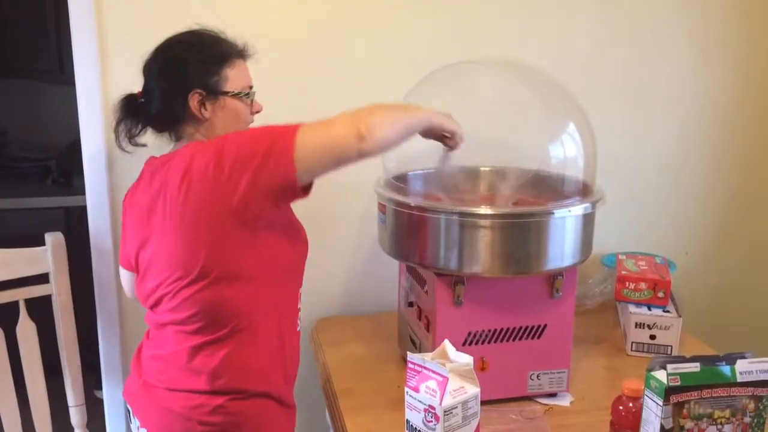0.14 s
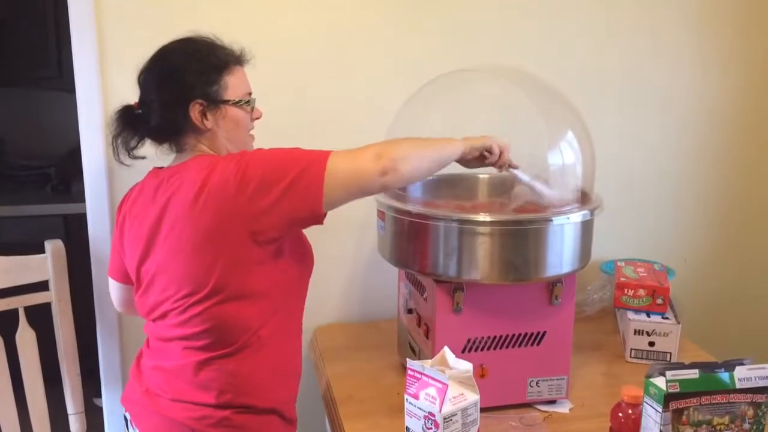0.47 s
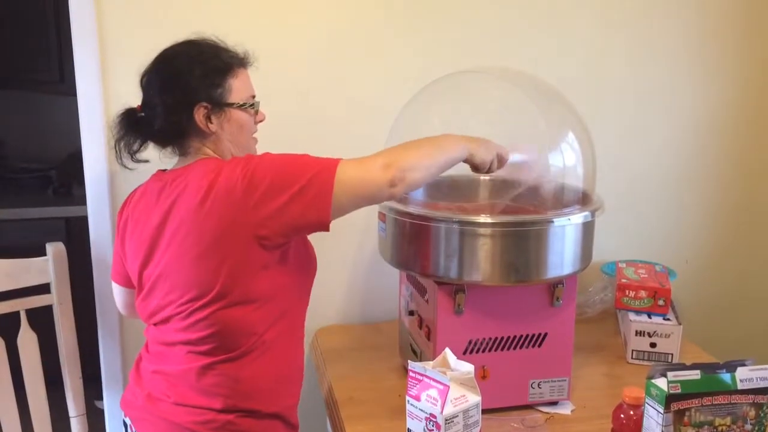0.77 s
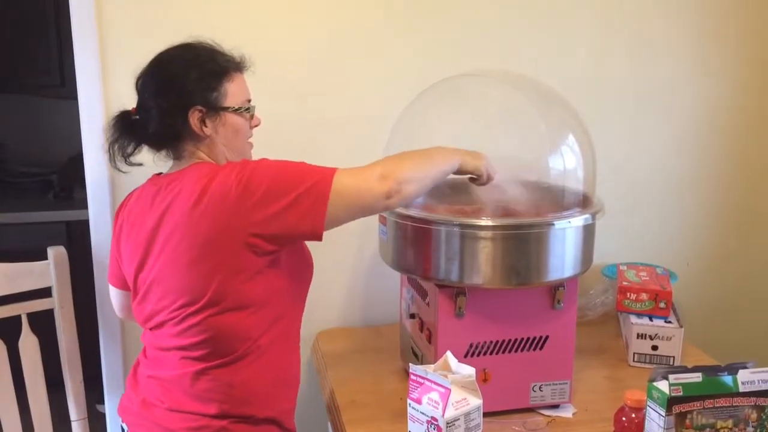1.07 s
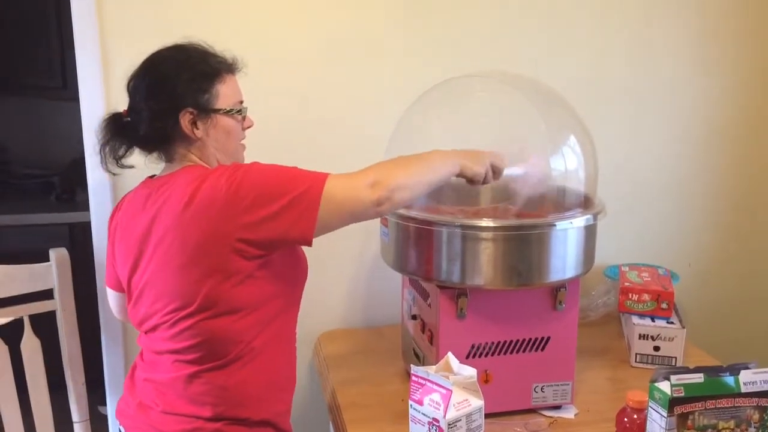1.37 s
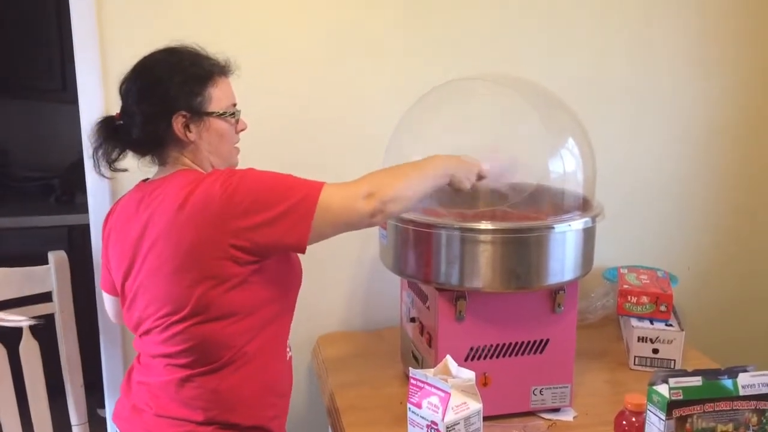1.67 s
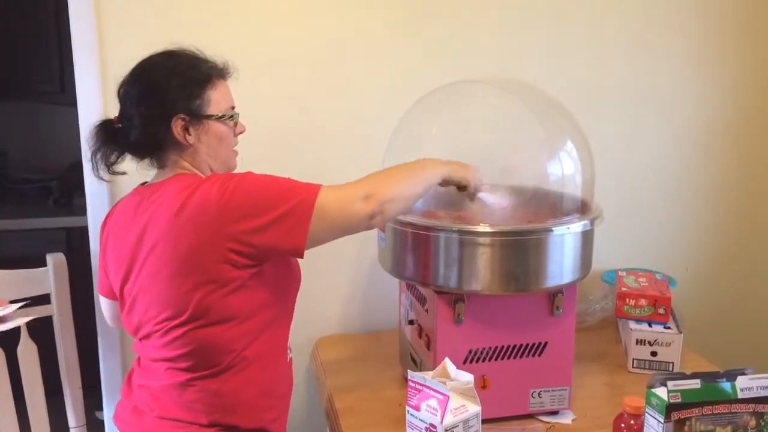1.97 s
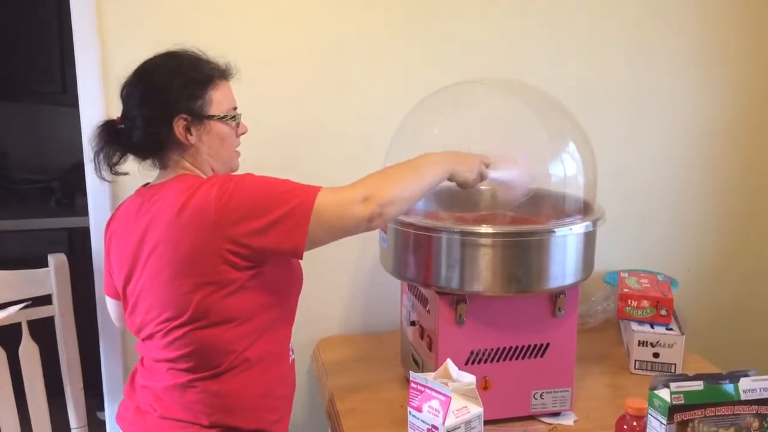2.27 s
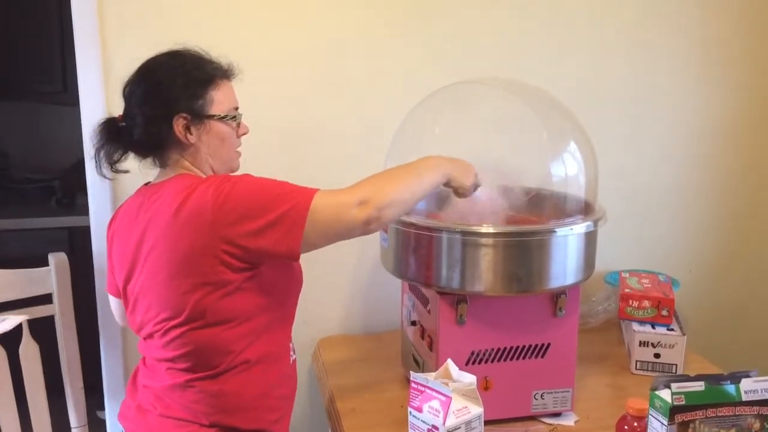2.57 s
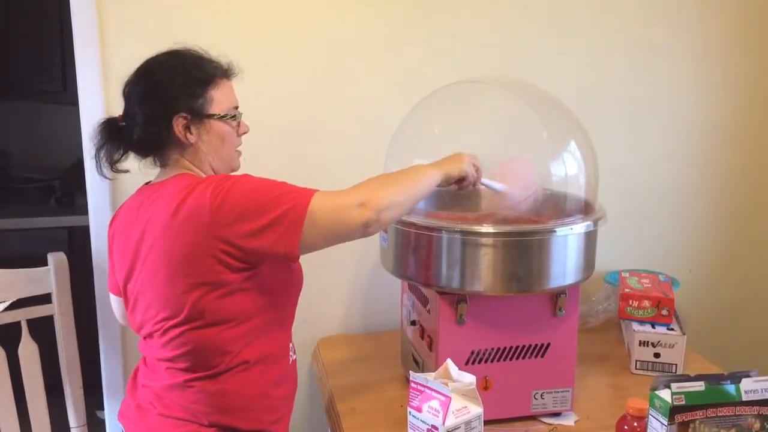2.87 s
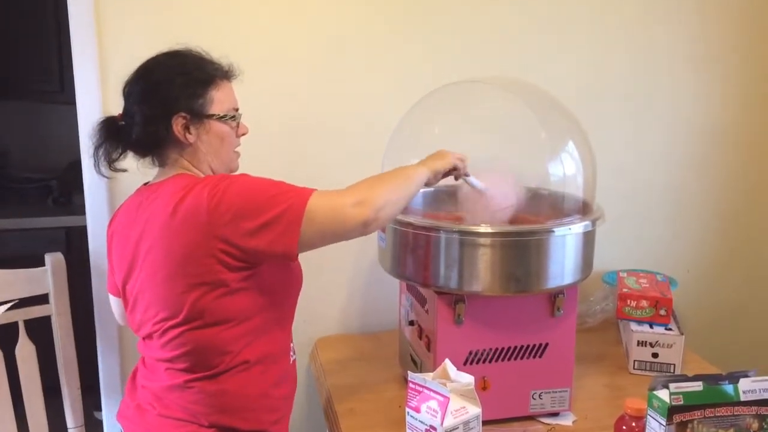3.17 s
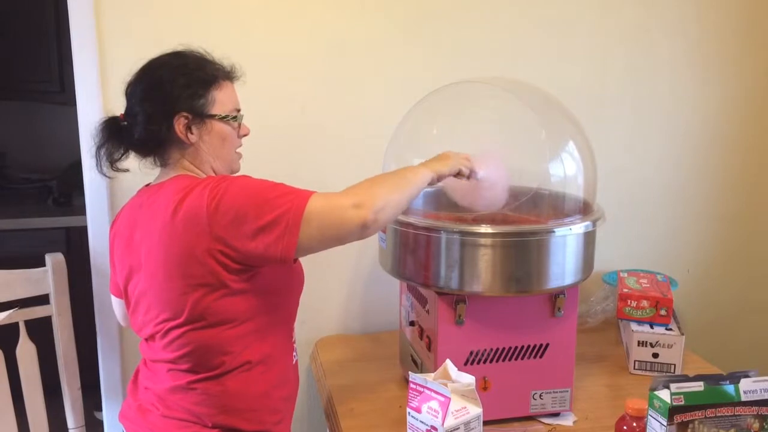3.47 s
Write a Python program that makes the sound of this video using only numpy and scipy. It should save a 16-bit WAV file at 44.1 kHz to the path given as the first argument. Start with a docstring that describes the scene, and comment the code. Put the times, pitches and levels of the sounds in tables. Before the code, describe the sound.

A cotton candy machine spins nearby indoors with a constant low hum, an airy whir and a thin metallic rattle. Soft low bumps come first, then scattered small knocks and two light taps, and another bump near the end.

```python
"""A cotton candy machine runs steadily on a wooden table in a small room. From the start, its
unbalanced spinning head makes the housing hum and buzz, a bearing sings and chatters once or twice
per turn, and the steel bowl rings as air whirs round it. Two soft, low bumps come right away, then
the bearing starts to knock now and then. Light taps sound in the room at about 1.1 and 2.2 seconds,
and one more bump comes just before the end."""
import sys
import numpy as np
from scipy import signal
from scipy.fft import rfft, irfft
from scipy.io import wavfile

SR = 44100
rng = np.random.default_rng(int(sys.argv[2]) if len(sys.argv) > 2 else 0)


def master_out(mix):
    """Clip the mix to full scale and print it as 16-bit PCM to the path in sys.argv[1]."""
    frames = np.transpose(np.atleast_2d(mix))
    ceiling = np.clip(frames, -1, 1)
    pcm = np.round(ceiling * 32767).astype(np.int16)
    wavfile.write(sys.argv[1], SR, pcm)


N = 160524

# tones of the housing's hum and buzz (multiple of the spin speed, relative level [dB])
HOUSING_TONES = [(1, -41), (2, -31.5), (3, -17.5), (4, -3.5), (5, 1), (6, -16.5), (7, -23), (8, -30),
                 (9, -30), (10, -27.5), (11, -35.5), (12, -41), (13, -38.5), (14, -65), (15, -29.5),
                 (16, -30), (17, -37.5), (18, -31.5), (19, -44), (20, -26.5), (21, -29), (22, -40.5),
                 (23, -35), (24, -31), (25, -34.5), (26, -32), (27, -38.5), (28, -36.5), (29, -32.5)]
# how strongly the housing's own resonance sounds (time [s], level [dB])
THROB_LEVELS = [(0, -38.5), (.6, -40.5), (1.5, -38), (2.25, -29.5), (2.8, -40), (3.0, -30), (3.3, -33),
                (3.6, -29)]
# loose drone of the bowl and table (pitch [Hz], width [Hz], level [dB])
DRONE_RINGS = [(188, 4.7, -40.5), (219, 37, -43), (156, 57, -47), (282, 16, -53.5), (42, 10, -62.5)]
# where the head rubs in each turn (start [turns], fade time [turns], relative level [dB])
RUB_SPOTS = [(.65, 0.33, -8.5), (.95, 0.15, -3)]
# rattle of the bearing (pitch [Hz], width [Hz], relative level [dB])
RATTLE_RINGS = [(1390, 23, -48), (1458, 140, -43.5), (1569, 90, -51), (1814, 75, -55)]
# how the bearing's chatter comes and goes (time [s], relative level [dB])
CHATTER_LEVELS = [(0.0, -46), (0.1, -37.5), (0.23, -40.5), (0.28, -31.5), (0.32, -44), (0.33, -35.5),
                  (0.41, -39.5), (0.88, -36), (0.94, -45), (0.96, -37), (1.26, -39.5), (1.27, -33.5),
                  (1.38, -41.5), (1.5, -39), (1.52, -49.5), (1.66, -38), (1.71, -43), (1.74, -34.5),
                  (1.84, -42), (2.62, -43.5), (2.64, -39.5), (3.45, -44), (3.52, -39.5), (3.63, -42)]
# thin rings of the steel bowl (pitch [Hz], width [Hz], level [dB])
BOWL_RINGS = [(868, 130, -52.5), (1990, 200, -54.5), (3030, 23, -63.5), (3220, 33, -70), (6760, 40, -72),
              (8230, 60, -75)]
# tone colour of the air and friction noise (frequency [Hz], relative level [dB])
WHIR_COLOUR = [(20, -13), (45, -5), (110, -2.5), (330, 2), (440, 0), (600, -7.5), (720, 2), (900, 3.5),
               (1100, -3), (1300, 0), (1700, -3), (2100, -2), (2650, -10), (3200, -9.5), (4200, -15),
               (5400, -17.5), (7200, -22.5), (9000, -27.5), (11000, -33), (13000, -42), (15300, -39)]
# how long the room echoes (frequency [Hz], time to fade by 60 dB [s])
ECHO_TIMES = [(300, 0.24), (3000, .4), (7000, 0.23), (10000, 0.2), (14000, 0.077)]
# soft, low bumps (time of the peak [s], swell and fade time [s], level [dB])
LOW_BUMPS = [(0.066, 0.023, -40), (0.173, .03, -42), (3.495, .022, -37)]
# harder knocks of the bearing (time [s], relative level [dB])
BEARING_KNOCKS = [(.270, -35), (.336, -29), (.612, -33), (.727, -35), (.955, -40), (1.072, -30.5),
                  (1.209, -35), (1.279, -32), (1.735, -29), (2.655, -30), (3.020, -32)]
# tones a knock sets ringing (pitch [Hz], relative level [dB], time to fade by 60 dB [s])
KNOCK_TONES = [(1512, -1.5, 0.073), (1289, 0.5, 0.055), (1677, -8, .04), (810, -16, 0.025)]
# light taps (time [s], relative level [dB])
LIGHT_TAPS = [(1.0607, -22.5), (2.1795, -14)]
# tone colour of a tap (frequency [Hz], boost or cut [dB])
TAP_FILTER = [(300, -25), (1800, -12), (2900, 2.5), (4600, 3), (6000, -0.5), (7800, -3.5), (10500, -14),
              (12000, -21), (15000, -25)]

SPIN_HZ = 43.585  # turns of the head per second


def amp(db):
    """Turns decibels into a number to multiply a sound by."""
    return 10 ** (np.asarray(db) / 20)


def evened(x):
    """Scales a signal so that its average strength (rms) is 1."""
    return x / np.sqrt(np.mean(x ** 2) + 1e-20)


def look_up(table, hz):
    """Reads between the rows of a frequency table, on a scale of octaves."""
    row_hz, value = np.transpose(table)
    return np.interp(np.log(hz + 1), np.log(row_hz + 1), value)


def coloured(x, gain):
    """Turns each frequency f in a sound up or down by gain(f)."""
    return irfft(rfft(x) * gain(np.fft.rfftfreq(len(x), 1 / SR)), len(x))


def drift(rate_hz):
    """A smooth random wobble of strength 1, mostly slower than rate_hz."""
    return evened(coloured(rng.standard_normal(N), lambda f: 1 / (1 + (f / rate_hz) ** 4)))


def rings(table):
    """Random shaking keeps a part ringing: each row gives a narrow band of noise."""
    out = 0
    for hz, width, db in table:
        band = coloured(rng.standard_normal(N), lambda f: 1 / (1 + (1.32 * (f - hz) / width) ** 2))
        out += amp(db) * evened(band)
    return out


def housing(turns):
    """The unbalanced head shakes the housing: low tones hum, high ones buzz where the head rubs."""
    t = np.arange(N) / SR
    mains_hz, hum_db, buzz_db = 120.4, -19.5, -21.5
    resonance, buzz_from = 4.5, 12  # multiples of the spin speed
    buzz_spot = .69  # share of a turn
    out = amp(-51) * np.sqrt(2) * np.sin(2 * np.pi * mains_hz * t)  # faint electric hum
    for multiple, db in HOUSING_TONES:
        if multiple < buzz_from:
            # the resonance spreads each turn's push out in time
            spread = 1.45 if multiple < resonance else 0.647
            lag = spread * (multiple - resonance) ** 2
            out += amp(hum_db + db) * np.cos(2 * np.pi * multiple * turns - lag)
        else:
            scatter = 0.72 * rng.standard_normal()  # puts the buzz tones a little out of step
            out += amp(buzz_db + db) * np.cos(2 * np.pi * multiple * (turns - buzz_spot) + scatter)
    # the resonance lies halfway between two hum tones, so it throbs on every second turn
    throb = np.cos(2 * np.pi * resonance * turns + .7 * drift(2))
    return out + amp(np.interp(t, *np.transpose(THROB_LEVELS))) * throb


def rubbing(turns, depth):
    """A loudness pulse: friction catches quickly and dies away at the same spots in every turn."""
    rise_turns = 0.034
    swell = 0
    for start, fade, db in RUB_SPOTS:
        since = (turns - start) % 1
        catch = 1 - np.exp(-(since / rise_turns) ** 2)
        swell += amp(db) * catch * np.exp(-since / fade)
    return evened(1 - depth + depth * swell)


def thin_tone(hz, waver, db):
    """A pure tone whose pitch wavers at random; waver is a share of the pitch."""
    pitch_hz = hz * (1 + waver * drift(19.9))
    return amp(db) * evened(np.sin(2 * np.pi * np.cumsum(pitch_hz) / SR))


def bearing(turns):
    """The bearing's whine and rattle come and go, chopped up unevenly by every turn."""
    chatter_db = np.interp(np.arange(N) / SR, *np.transpose(CHATTER_LEVELS)) + 39.5
    whine = thin_tone(hz=1470.5, waver=.003, db=-42.5) * amp(0.99 * chatter_db)
    rattle = rings(RATTLE_RINGS) * amp(chatter_db)
    flutter = evened(amp(0.7 * drift(32)))
    return (whine + rattle) * rubbing(turns, depth=0.69) * flutter


def bowl(turns):
    """Every turn sets the steel bowl ringing again."""
    ringing = thin_tone(hz=848.4, waver=0.0032, db=-52.5) + rings(BOWL_RINGS)
    return ringing * rubbing(turns, depth=0.69)


def room_echo(x):
    """The room sends a sound back as many tiny echoes; the highest frequencies fade first."""
    echoes_per_s = 4000
    echoes = rng.standard_normal(SR) * (rng.random(SR) < echoes_per_s / SR)
    hz, t, spectrum = signal.stft(echoes, SR, nperseg=256)
    fade = amp(-60 * t / look_up(ECHO_TIMES, hz)[:, None])
    tail = signal.istft(spectrum * fade, SR, nperseg=256)[1]
    return signal.fftconvolve(x, tail / np.linalg.norm(tail))[:N]


def whir(turns):
    """Air and friction noise, with a little room echo, pulses as the head spins."""
    ripple = 1 + .07 * sum(np.cos(2 * np.pi * per_turn * turns) for per_turn in (8, 10))
    air = rng.standard_normal(N)
    air = air + amp(-12) * room_echo(air)
    flutter = amp(0.77 * drift(26))
    pulsing = air * rubbing(turns, depth=0.41) * ripple * flutter
    return amp(-40.5) * evened(coloured(pulsing, lambda f: amp(look_up(WHIR_COLOUR, f))))


def bumps(hz=63):
    """Each soft bump is a low tone that quickly swells and fades."""
    out = 0
    for peak, length, db in LOW_BUMPS:
        t = np.arange(N) / SR - peak
        out += amp(db) * np.exp(-(t / length) ** 2) * np.sin(2 * np.pi * hz * t)
    return out


def clicks(table):
    """One sharp click for each row of (time [s], level [dB])."""
    return sum(amp(db) * (np.arange(N) == round(start * SR)) for start, db in table)


def knocks(rise_s=0.00071):
    """Now and then the bearing knocks harder and rings briefly."""
    t = np.arange(SR // 4) / SR
    ring = sum(amp(db - 60 * t / fade) * np.sin(2 * np.pi * hz * t) for hz, db, fade in KNOCK_TONES)
    rise = 1 - np.exp(-(t / rise_s) ** 2)
    return signal.fftconvolve(clicks(BEARING_KNOCKS), ring * rise)[:N]


def taps():
    """Two small, hard ticks, each followed by the room's echo."""
    ticks = coloured(clicks(LIGHT_TAPS), lambda f: amp(look_up(TAP_FILTER, f)))
    return ticks + amp(2.5) * room_echo(ticks)


def scene():
    """The spinning head sets the machine's rhythm; a drone, bumps, knocks and taps join in."""
    speed_hz = SPIN_HZ * (1 + .0002 * drift(1))
    wobble = 0.0011 * drift(13)
    turns = .33 + np.cumsum(speed_hz) / SR + wobble  # how far the head has turned
    machine = housing(turns) + rings(DRONE_RINGS) + bearing(turns) + bowl(turns) + whir(turns)
    return (machine + bumps() + knocks() + taps())[None]


def record(dry):
    """Cuts away the very highest treble."""
    low_pass = signal.firwin(511, cutoff=15300, window=("kaiser", 9), fs=SR)
    return signal.oaconvolve(dry, low_pass[None], "same")


dry = scene()
out = record(dry)
master_out(out)
```